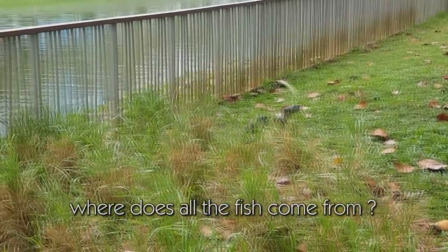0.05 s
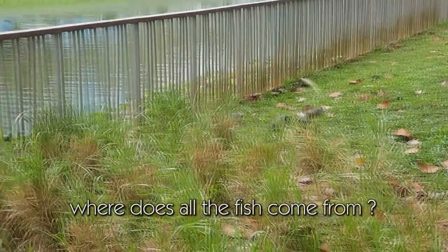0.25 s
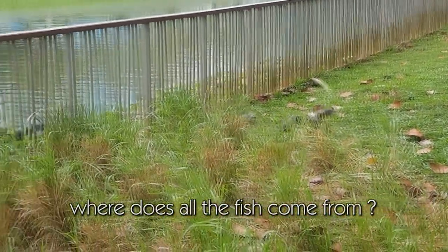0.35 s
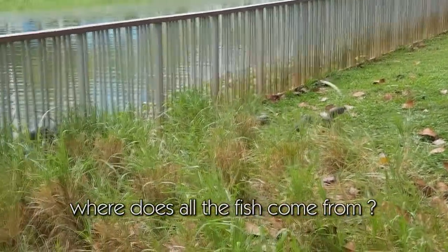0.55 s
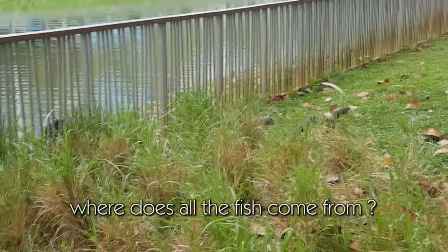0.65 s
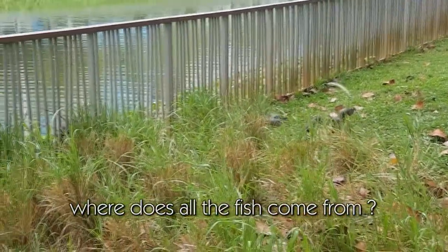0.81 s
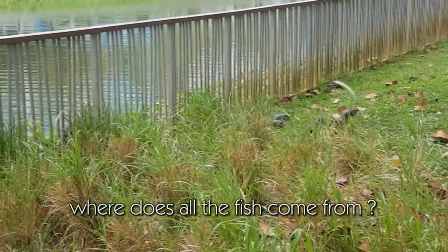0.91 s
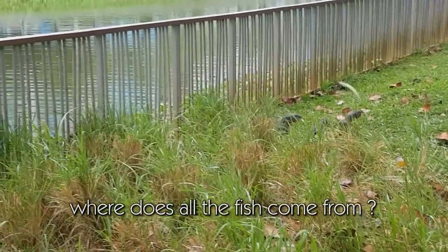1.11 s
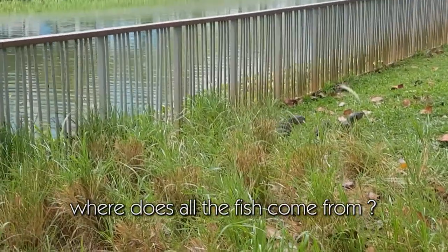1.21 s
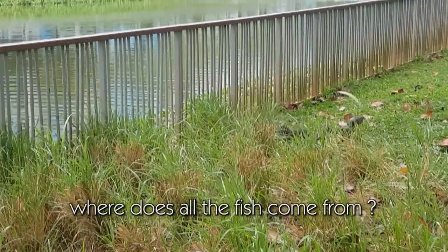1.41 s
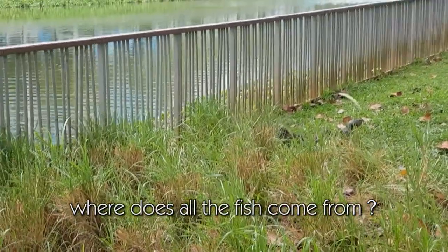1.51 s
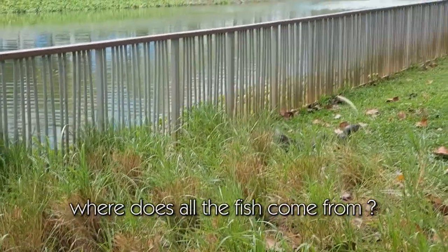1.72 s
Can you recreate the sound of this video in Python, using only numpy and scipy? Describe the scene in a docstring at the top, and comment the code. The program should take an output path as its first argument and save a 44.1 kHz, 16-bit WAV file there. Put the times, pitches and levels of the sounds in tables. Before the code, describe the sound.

An otter calls once from grass by a pond: a quick gliding squeal ending in a sharp falling chirp. As the echo fades, a small tick, brief hisses and gentle wind puffs on the microphone sit over far-off traffic.

```python
"""Otters by a pond railing

Otters call in the grass: thin gliding squeals break into a squeak and one sharp chirp, then a pip.
The railing throws the calls back and the park lets them die away. Distant traffic washes underneath.
Light wind bumps the microphone, brief hisses brush its right side, and there is one small dry tick."""
import sys
import numpy as np
from scipy import signal
from scipy.io import wavfile

SR = 44100
rng = np.random.default_rng(int(sys.argv[2]) if len(sys.argv) > 2 else 0)


def generate_wav(signal):
    """Clip the signal to [-1, 1] and save it as 16-bit WAV at the path in sys.argv[1]."""
    frames = np.transpose(np.atleast_2d(signal))
    scaled = np.clip(frames, -1, 1) * 32767
    pcm = np.round(scaled).astype(np.int16)
    wavfile.write(sys.argv[1], SR, pcm)


N = 77175
TIME_S = np.arange(N) / SR
CUTOFF_HZ = 15700
SQUEAK_PAN_DB, SQUEAK_LAG_S = 5, .00007


def voice(contour, haze, overtones_db=(), left_lag_s=0):
    """Unsteady gliding tone; haze is the share of soft noise around each partial."""
    jitter_share, shimmer_db, flutter_hz, edge_s = .006, 1.36, 320, .0015
    s, hz, db = np.transpose(contour)
    pitch_hz = np.interp(TIME_S, s, hz) * (1 + jitter_share * drift(flutter_hz))
    phase = 2 * np.pi * (np.cumsum(pitch_hz) / SR - pitch_hz * np.array([[left_lag_s], [0]]))
    gate = np.clip(np.minimum(TIME_S - s[0], s[-1] - TIME_S) / edge_s + .5, 0, 1)
    tone = 0
    for k, partial_db in enumerate([0, *overtones_db], 1):
        noise = haze * unit_rms(band(rng.standard_normal((2, 2, N)), 94, 940))
        partial = (1 + noise[0]) * np.sin(k * phase) + noise[1] * np.cos(k * phase)
        tone = tone + from_db(partial_db + shimmer_db * drift(flutter_hz)) * partial
    return tone * gate * from_db(np.interp(TIME_S, s, db))


def otter_squeals():
    """An arched squeal, a faint rising whistle, and a falling squeal that swells out of the first."""
    # Call contours. Each row: time in seconds, pitch in Hz, level in dB.
    arched = [(.034, 6680, -49.5), (.05, 7150, -43.5), (.07, 7320, -48), (.09, 7600, -47),
              (.112, 7300, -50), (.14, 6700, -45.5), (.162, 6530, -40), (.188, 6100, -51.5),
              (.205, 6220, -44), (.25, 5930, -56)]
    whistle = [(.139, 10000, -60), (.149, 11500, -54), (.178, 12600, -74)]
    falling = [(.07, 7850, -58), (.1, 8050, -56), (.14, 7860, -58), (.19, 7600, -53.5), (.208, 7080, -47),
               (.222, 6940, -38.5), (0.236, 6700, -30), (0.249, 6270, -38), (0.254, 6500, -67),
               (0.261, 5860, -43), (.263, 5700, -45)]
    return pan(7) * (voice(arched, haze=.38, overtones_db=[-4])
                     + voice(whistle, haze=.38)
                     + voice(falling, haze=.12, overtones_db=[-3.5]))


def otter_squeak():
    """The squeal breaks to a lower, stronger squeak."""
    # Each row: time in seconds, pitch in Hz, level in dB.
    contour = [(.2638, 5626, -37), (.266, 5504, -28), (.272, 5210, -31), (.283, 4910, -26),
               (.289, 4320, -40), (.293, 4334, -45), (.296, 3875, -19.5)]
    tone = voice(contour, haze=.14, overtones_db=[-12, -28], left_lag_s=SQUEAK_LAG_S)
    return pan(SQUEAK_PAN_DB) * tone


def otter_chirp():
    """Sharp falling chirp, rich in overtones."""
    # Each row: time in seconds, pitch in Hz, level in dB.
    contour = [(.2888, 2400, -23.5), (.29, 2287, -14.5), (.2917, 2218, -12.5), (.294, 2142, -15),
               (.2958, 1890, -30.5), (.2975, 1640, -26)]
    return pan(2.8) * voice(contour, haze=.042, overtones_db=[-17.5, -31, -42, -42, -30])


def otter_pip():
    """A last high pip."""
    # Each row: time in seconds, pitch in Hz, level in dB.
    contour = [(.331, 8200, -47), (.346, 8680, -44), (.351, 9300, -38), (.361, 9480, -39),
               (.368, 9480, -52), (.38, 9450, -58)]
    return pan(SQUEAK_PAN_DB) * voice(contour, haze=.14, left_lag_s=SQUEAK_LAG_S)


def airy_burst():
    """Airy noise as the squeak breaks into the chirp."""
    # Each row: time in seconds, level in dB.
    swell = [(.255, -79), (.268, -51), (.286, -44), (.292, -36), (.299, -51), (.304, -80)]
    # Each row: frequency in Hz, relative density in dB.
    spectrum = [(1500, -4), (3200, -1.5), (4500, -3), (6000, 8.5), (7500, 0), (9000, -17), (10500, -18),
                (12000, -14), (14000, -6), (15500, -11)]
    level_db = np.interp(TIME_S, *np.transpose(swell), left=-np.inf, right=-np.inf)
    return pan(SQUEAK_PAN_DB) * from_db(level_db) * coloured_noise(spectrum, flicker_db=-1)


def otters():
    """The calls, direct and reflected by railing, grass and park."""
    squeals, squeak, pip = otter_squeals(), otter_squeak(), otter_pip()
    chirp, burst = otter_chirp(), airy_burst()
    direct = squeals + squeak + pip + chirp + burst
    # Sends to the park; the burst arrives mostly by reflection.
    carried = squeak + from_db(-8) * squeals + from_db(-7) * pip + from_db(-12) * chirp
    carried += from_db(10) * burst
    return direct + railing(direct) + grass(squeals + squeak + pip) + park(carried, chirp)


def railing(calls, delay_s=.0155):
    """One clean echo plus scatter from the bars."""
    echo = np.array([np.interp(TIME_S - delay_s, TIME_S, side) for side in calls])
    return from_db(-15) * echo + from_db(-11.5) * echo_cluster(calls, delay_s, spread_s=.013)


def grass(calls):
    """Short scatter from the grass."""
    return from_db(-7) * scatter(calls, decay(t60_s=.15))


def park(calls, chirp, split_hz=7400):
    """Far echoes, one for the chirp alone, and a tail whose treble dies sooner."""
    # Each row: delay in seconds, spread in seconds, level in dB.
    echoes = [(.045, 0.0039, -13), (.1, 0.053, -13.5)]
    far = sum(from_db(db) * echo_cluster(calls, delay_s, spread_s) for delay_s, spread_s, db in echoes)
    far += from_db(-22) * echo_cluster(chirp, delay_s=.099, spread_s=.0076)
    tail = from_db(-13.5) * scatter(band(calls, 1160, split_hz, order=4), decay(t60_s=1))
    treble = from_db(-8) * scatter(band(calls, split_hz, CUTOFF_HZ), decay(t60_s=.62))
    return pan(1) * (far + tail + treble)


def wind_bumps(low_hz=53.8, dip_gain=.65):
    """Eddies hit the microphone: a pressure dip inside a low puff that differs on each side."""
    # Each row: centre in seconds, half length in seconds, level in dB, top edge in Hz, pan in dB.
    bumps = [(0.029, 0.016, -43.5, 165, -6), (.633, 0.014, -39, 173, -8.5), (.745, 0.063, -43.5, 138, -7),
             (0.848, 0.0093, -35.5, 408, -6), (0.903, 0.017, -42, 193, -12),
             (0.956, 0.0084, -38.5, 400, -9.5), (1.127, 0.027, -43.5, 133, -4),
             (1.156, 0.0041, -34.5, 576, -20), (1.266, 0.014, -40.5, 113, -1.5),
             (1.312, 0.014, -39.5, 424, -27), (1.35, .013, -37.5, 360, 1.5), (1.441, 0.017, -37.5, 247, -2),
             (1.739, 0.017, -43, 120, -3)]
    out = 0
    for centre_s, half_s, db, top_hz, pan_db in bumps:
        envelope = np.exp(-((TIME_S - centre_s) / half_s) ** 2 / 2)
        puff = band(rng.standard_normal((2, N)), low_hz, top_hz, order=4) * envelope
        puff *= np.sqrt(np.sum(envelope ** 2) / np.sum(puff ** 2, axis=1, keepdims=True))
        half_cycles = (TIME_S - centre_s) * top_hz * 2
        dip = 2 * (half_cycles ** 2 - 1) * np.exp(-half_cycles ** 2 / 2)
        out = out + from_db(db) * pan(pan_db) * (puff + dip_gain * dip) / np.hypot(1, dip_gain / 2)
    return out


def hisses(left_db=-21):
    """Short soft swishes close to the microphone's right side."""
    # Each row: start, attack, hold and release in seconds, level in dB.
    swishes = [(0.462, 0.026, 0.049, 0.038, -39.5), (.724, 0.0067, 0.024, 0.053, -42),
               (1.078, 0.019, 0.019, 0.084, -41), (1.369, 0.013, 0.018, 0.023, -46)]
    # Each row: frequency in Hz, relative density in dB.
    spectrum = [(500, -10), (1100, -2.5), (1900, 2.5), (2800, -2), (4300, -2.5), (6000, -20.5), (9000, -22),
                (15000, -37)]
    envelope = sum(from_db(db) * np.interp(TIME_S, start_s + np.cumsum([0, *stages_s]), [0, 1, 1, 0])
                   for start_s, *stages_s, db in swishes)
    return envelope * coloured_noise(spectrum, flicker_db=-.5) * from_db([[left_db], [0]])


def tick(start_s=.502, t60_s=.018):
    """Small dry tick, like a grass stem snapping."""
    envelope = (TIME_S >= start_s) * from_db(-60 * np.abs(TIME_S - start_s) / t60_s)
    return from_db(-25) * band(rng.standard_normal((2, N)) * envelope, 800, 2600)


def traffic():
    """Distant traffic: a wide, low wash."""
    # Each row: frequency in Hz, relative density in dB.
    spectrum = [(25, -30), (50, -8), (100, -2), (200, -7), (300, -10.5), (420, -7.5), (580, -13), (780, -9),
                (1200, -14), (1900, -9), (2500, -14), (3400, -24), (5200, -27.5), (7500, -35), (9500, -46),
                (13500, -37.5), (15500, -46)]
    # Each row: frequency in Hz, pan in dB, left-right correlation.
    width = [(60, 0, 0.63), (130, -5, 0.15), (296, -1, 0.6), (650, 1.5, 0.53), (1330, -2.5, -0.18),
             (2400, 4, 0.028), (3820, 4, 0), (7400, 7, 0), (15000, 1, -0.19)]
    return from_db(-44) * coloured_noise(spectrum, flicker_db=1.37, width=width)


def coloured_noise(spectrum, flicker_db, width=None):
    """Third-octave bands of stereo noise, each flickering on its own; unit rms."""
    edges_hz = 22 * 2 ** (np.arange(30) / 3)
    edges_hz = edges_hz[edges_hz > spectrum[0][0] / 2]
    white = rng.standard_normal((2, 2, N + SR // 10))
    out = 0
    for k, (low_hz, high_hz) in enumerate(zip(edges_hz, edges_hz[1:])):
        mid, side = band(white[k % 2], low_hz, high_hz, order=3)[:, -N:]
        hz = np.sqrt(low_hz * high_hz)
        pan_db, correlation = (at_hz(width, hz), at_hz(width, hz, column=2)) if width else (0, 0)
        pair = np.sqrt(1 + correlation) * mid + np.sqrt(1 - correlation) * side * [[1], [-1]]
        out = out + pair * pan(pan_db) * from_db(at_hz(spectrum, hz) + flicker_db * drift(9.9))
    return unit_rms(out)


def scatter(x, envelope):
    """Many small reflections, different on each side, under an envelope of unit energy."""
    response = rng.standard_normal((2, N)) * envelope / np.sqrt(np.sum(envelope ** 2))
    return signal.fftconvolve(x, response, axes=1)[:, :N]


def echo_cluster(x, delay_s, spread_s):
    """Reflections bunched around one delay."""
    return scatter(x, np.exp(-np.abs(TIME_S - delay_s) / spread_s) * (TIME_S > delay_s / 2))


def drift(rate_hz):
    """Smooth random wander, unit rms."""
    pole = np.exp(-2 * np.pi * rate_hz / SR)
    white = rng.standard_normal(N + SR // 2)
    return unit_rms(signal.lfilter([1], [1, -2 * pole, pole * pole], white)[-N:])


def band(x, low_hz, high_hz, order=2):
    sos = signal.butter(order, [low_hz, min(high_hz, SR * .45)], "band", fs=SR, output="sos")
    return signal.sosfilt(sos, x)


def at_hz(rows, hz, column=1):
    table = np.array(rows)
    return np.interp(np.log(hz), np.log(table[:, 0]), table[:, column])


def pan(left_minus_right_db):
    return unit_rms(from_db([[left_minus_right_db / 2], [-left_minus_right_db / 2]]))


def decay(t60_s):
    return from_db(-60 * TIME_S / t60_s)


def from_db(db):
    return 10 ** (np.asarray(db) / 20)


def unit_rms(x):
    return x / np.sqrt(np.mean(x ** 2) + 1e-20)


def scene():
    """Otters over traffic and wind."""
    return traffic() + otters() + wind_bumps() + hisses() + tick()


def record(dry):
    """Steep low-pass."""
    return signal.sosfilt(signal.ellip(12, .1, 80, CUTOFF_HZ, fs=SR, output="sos"), dry)


dry = scene()
out = record(dry)
generate_wav(out)
```